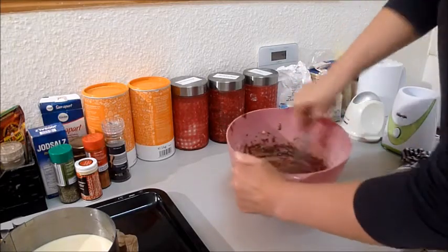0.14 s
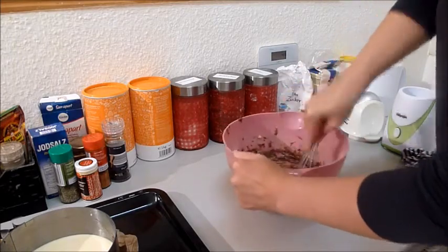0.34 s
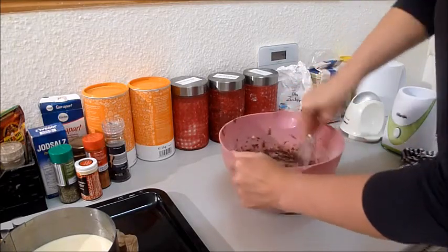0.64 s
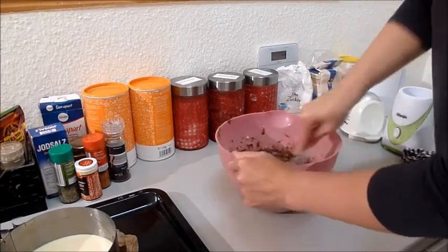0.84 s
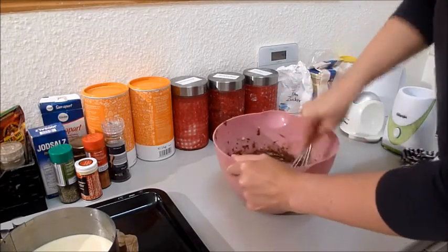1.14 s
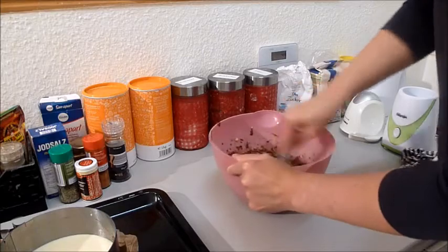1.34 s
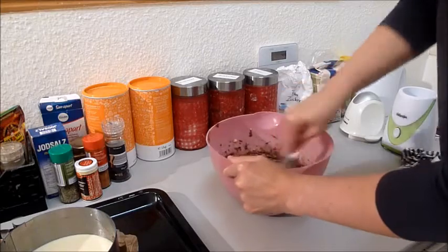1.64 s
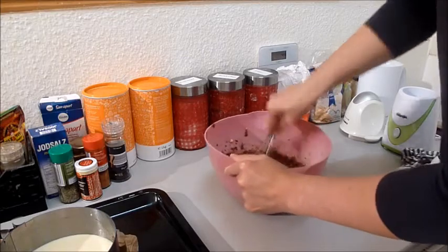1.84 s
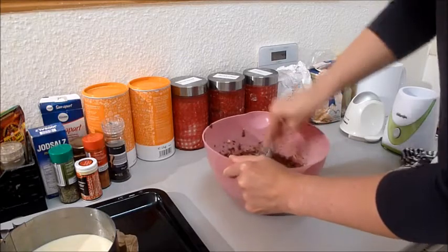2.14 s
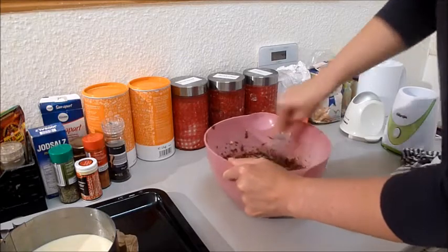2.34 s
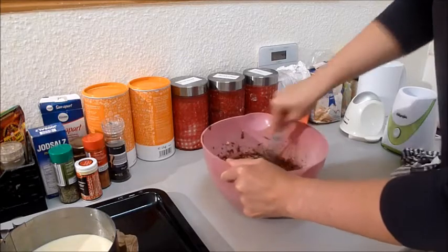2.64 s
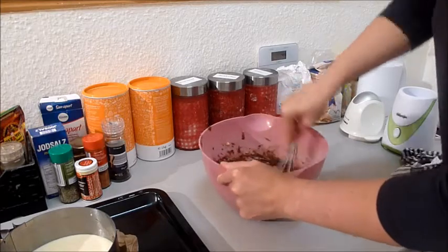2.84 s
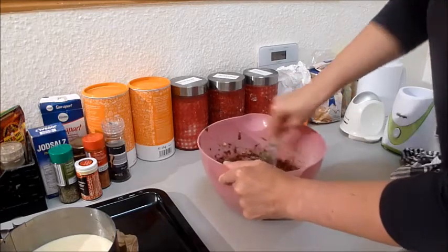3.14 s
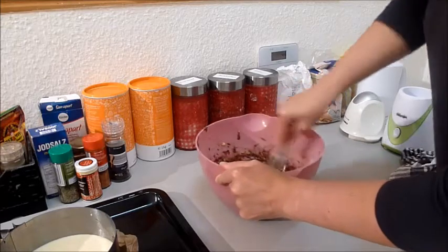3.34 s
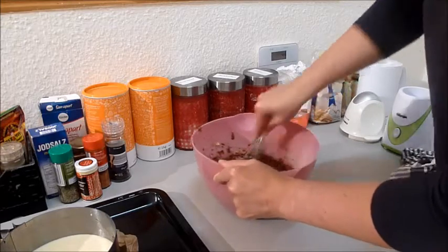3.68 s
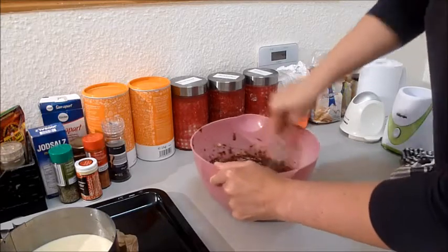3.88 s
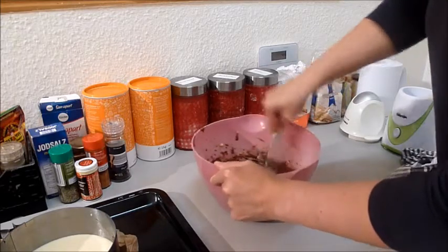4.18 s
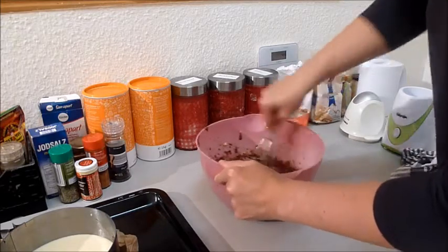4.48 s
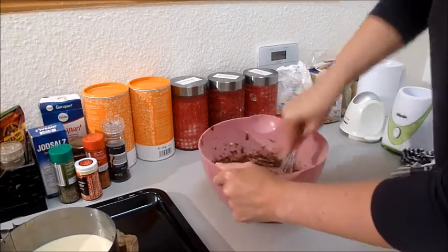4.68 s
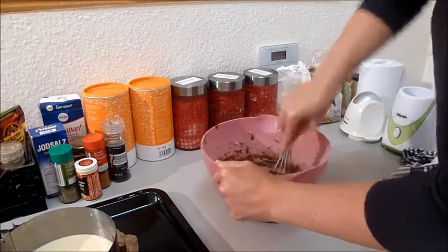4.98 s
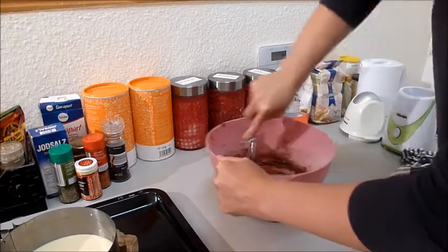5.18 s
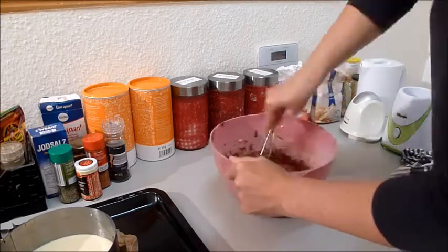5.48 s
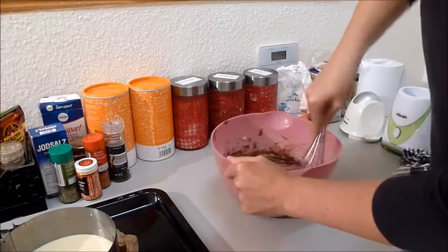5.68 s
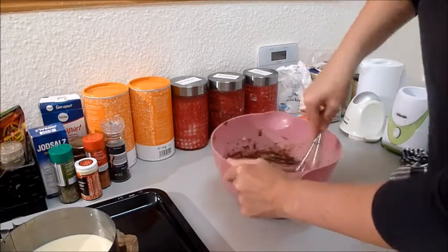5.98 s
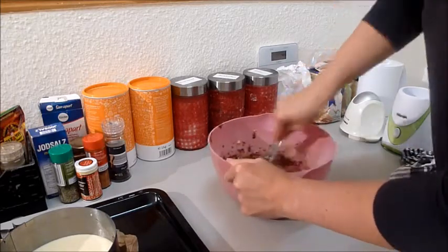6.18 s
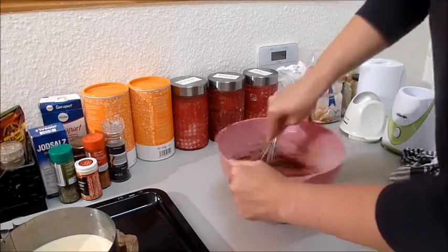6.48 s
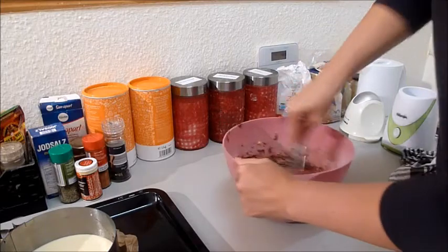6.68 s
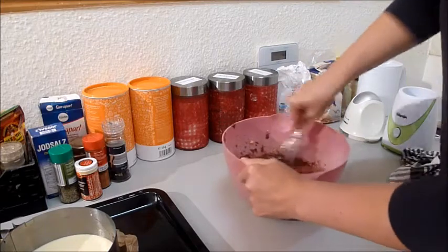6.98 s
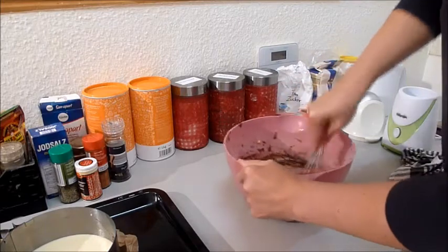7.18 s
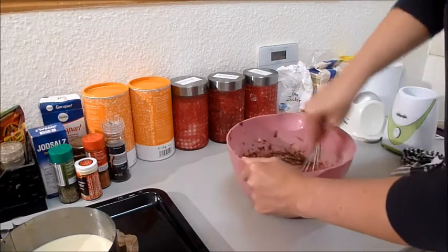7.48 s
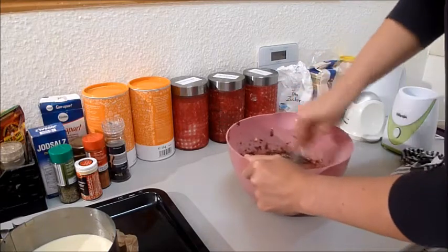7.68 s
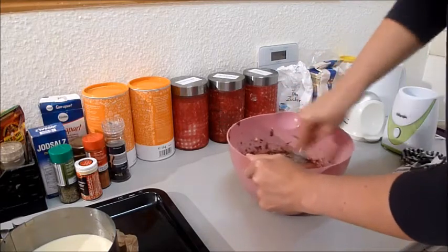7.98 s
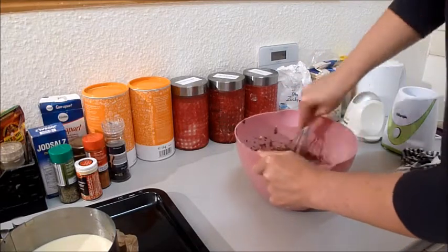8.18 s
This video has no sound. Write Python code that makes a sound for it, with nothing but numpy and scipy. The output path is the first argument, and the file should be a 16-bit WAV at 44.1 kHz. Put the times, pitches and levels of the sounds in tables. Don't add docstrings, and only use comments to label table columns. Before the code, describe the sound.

Continuous energetic whisking in a thin plastic bowl on a kitchen counter. Wires clatter and drag against the wall between quick, uneven blows; thick batter damps each ring. The middle has a dense run of soft thuds and hard knocks, then strokes loosen into stronger clacks with lighter taps between. Faint low bumps come from the counter. A small reflective room, heard from about a step away through a narrow-band microphone.

```python
import sys
import numpy as np
from scipy import signal
from scipy.fft import rfft, irfft
from scipy.io import wavfile
from scipy.ndimage import uniform_filter1d, map_coordinates

SR = 44100
rng = np.random.default_rng(int(sys.argv[2]) if len(sys.argv) > 2 else 0)


def ratio(d):
    e = np.asarray(d, float) / 20
    return 10 ** e


def to_wav(s):
    ch = np.atleast_2d(s).T
    pcm = np.round(np.clip(ch, -1, 1) * 32767)
    wavfile.write(sys.argv[1], SR, pcm.astype(np.int16))


N = 366912


def evened(x):
    return x / np.sqrt(np.mean(x ** 2) + 1e-20)


def peaked(x):
    return x / abs(x).max()


def add(mix, start_s, sound):
    part = mix[round(start_s * SR):][:len(sound)]
    part += sound[:len(part)]


def ring(modes, chance, detune, rise_s=1e-4, scatter_db=0.5, size=1800):
    hz, db, t60 = np.transpose(modes)[:, :, None]
    t = np.arange(size) / SR
    weight, tune, phase = chance[:len(hz)].T[:, :, None]
    level = ratio(db + scatter_db * weight - 60 * t / t60) * (1 - np.exp(-t / rise_s))
    waves = np.sin(2 * np.pi * (hz * (1 + detune * tune) * t + phase))
    return (level * waves).sum(0)


def one_mode(hz, db, t60, rise_s=1e-4, size=1800):
    return ring([(hz, db, t60)], np.zeros((1, 3)), 0, rise_s, size=size)


def clumps(count):
    knot_s, clump_s, depth_db = 0.004, 0.012, 4.5
    knots = rng.standard_normal((count, round(N / SR / knot_s) + 2))
    smooth = evened(uniform_filter1d(knots, round(clump_s / knot_s), axis=1))
    at = np.arange(N) / SR / knot_s
    return [ratio(depth_db * np.interp(at, np.arange(len(row)), row)) for row in smooth]


# pitch_hz [Hz], level_db [dB]
HOLLOW_MODES = [(155, -4.5), (230, -11.5), (327, -7), (432, -24.5), (494, 3), (545, 6.5), (582, 0),
                (630, -7.5), (686, 4.5), (800, -4.5)]
# pitch_hz [Hz], level_db [dB]
WALL_MODES = [(1035, -0.5), (1166, -6), (1245, 2.5), (1370, -11.5), (1470, 3.5), (1620, -5), (1765, -7),
              (1880, 2), (2040, -7), (2200, -0.5), (2450, -5), (2650, -5)]
# pitch_hz [Hz], level_db [dB]
WIRE_MODES = [(2800, 2), (3500, -2), (4400, -3), (5400, 0), (6500, -11)]
BODIES = [[(hz, db, t60) for hz, db in modes]
          for modes, t60 in ((HOLLOW_MODES, 0.03), (WALL_MODES, 0.02), (WIRE_MODES, 0.002))]
DETUNE = (0.023, 0.083, 0.17)
# pitch_hz [Hz], level_db [dB], t60_s [s]
FIZZ_MODES = [(4300, 5.5, 0.0021), (5180, -6.5, 0.0019), (6100, -4, 0.0028), (6800, -0.5, 0.0036)]
# start_s [s], bottom_db [dB], wall_db [dB]
DRAG_PRESSURE = [(0.0, -32, -35), (0.37, -33.5, -37), (0.63, -35.5, -35.5), (1.431, -36.5, -37.5),
                 (2.461, -38.5, -37.5), (2.87, -31.5, -34), (3.22, -32, -38), (4.43, -39.5, -37),
                 (4.73, -38, -35), (5.08, -32, -33.5), (5.331, -42.5, -33.5), (5.91, -41.5, -40),
                 (6.33, -34, -35), (6.77, -43, -40), (7.25, -34, -35.5), (7.6, -43.5, -41.5),
                 (7.92, -35, -40), (8.32, -45, -40)]
# landing_s [s], air_s [s], depth_db [dB]
WHISK_LIFTS = [(0.099, 0.084, -7), (0.7, 0.081, -4.5), (.93, 0.081, -3), (1.19, 0.03, -9.5),
               (1.499, 0.095, -2), (1.8, 0.086, -3.5), (2.3, 0.069, -1.5), (3.103, 0.038, -15),
               (3.599, 0.061, -1.5), (4.219, 0.057, -1), (4.348, 0.067, -6.5), (4.458, 0.078, -5.5),
               (5.106, 0.16, -13.5), (5.506, 0.076, -11.5), (5.861, 0.046, -34), (6.717, 0.09, -10),
               (6.95, 0.13, -4.5), (7.241, 0.045, -15), (7.53, 0.088, -6.5), (7.705, 0.12, -1.5),
               (1.36, 0.037, 1.5), (1.739, 0.071, -5.5), (3.03, 0.037, -5), (4.5, 0.014, -10),
               (5.948, 0.3, -2), (8.12, 0.035, -3), (3.667, 0.053, -5), (2.49, 0.031, -1),
               (3.27, 0.044, -1.5)]


def drag():
    slips_per_s, slip_spread_db, hiss_db = 600, 3, -1.5
    lift_ramp_s, strokes_per_s, spots = 0.041, 3.3, 6
    start_s, bottom_db, wall_db = np.transpose(DRAG_PRESSURE)
    t = np.arange(N) / SR
    lifted_db = np.zeros(N)
    for landing_s, air_s, depth_db in WHISK_LIFTS:
        lifted_db += depth_db * np.clip((t - landing_s + air_s) / lift_ramp_s, 0, 1) * (t < landing_s)
    # modes, detune, trim dB, colour scatter dB, pitch wander, pressure
    layers = [(BODIES[0], DETUNE[0], -1.5, 2.7, 0.012, bottom_db),
              (BODIES[1], DETUNE[1], -5, 5, 0.04007, wall_db),
              (BODIES[2], DETUNE[2], -7.5, 1.5, 0.05, wall_db),
              (FIZZ_MODES, 0.08, -15, 2.2, 0.05, wall_db)]
    out = np.zeros(N)
    for modes, detune, trim_db, patch_db, wander, pressure_db in layers:
        force = ratio(slip_spread_db * np.minimum(rng.exponential(1, N), 4))
        slips = force * (rng.random(N) < slips_per_s / SR)
        rub = evened(slips) + ratio(hiss_db) * rng.standard_normal(N)
        spot = rng.integers(0, spots, N)
        body = np.zeros(N)
        for k, gain in enumerate(clumps(spots)):
            colour = ring(modes, rng.standard_normal((12, 3)), 0.86 * detune, scatter_db=patch_db)
            body += signal.oaconvolve(rub * gain * (spot == k), colour)[:N]
        circle = 2 * np.pi * strokes_per_s
        bent = t + wander * np.sin(circle * t) / circle
        body = map_coordinates(body, [bent * SR], order=2, mode="mirror")
        out += ratio(np.interp(t, start_s, pressure_db) + lifted_db + trim_db) * evened(body)
    return out


def skidding_wires(clack_hz, on_wall, skid_s):
    t = np.arange(1500) / SR
    n = rng.standard_normal(len(t))
    skid = n * abs(n) * np.minimum(4.2 * t / skid_s, 1) * np.exp(-t / skid_s)
    spread = rfft(skid, 2048)
    skid = irfft(spread / np.sqrt(uniform_filter1d(abs(spread) ** 2, size=24)))[:len(t)]
    chance = rng.standard_normal((12, 3)) * [1, 1, 0]
    wires = ring(BODIES[2], chance, DETUNE[2], scatter_db=3.0, size=300)
    wires += one_mode(clack_hz * (not on_wall), 0.5, 0.003, size=300)
    return peaked(signal.lfilter(*signal.butter(2, 2200, "high", fs=SR), signal.fftconvolve(wires, skid)))


def blows(rows):
    bounce_s, bounce_db = 0.021, -14.5
    out = np.zeros(N)
    for start_s, hollow_db, hollow_hz, wall_db, clack_hz, wires_db in rows:
        slower = ratio(0.65 * (-12.0 - max(hollow_db, wall_db, wires_db)))
        on_wall = clack_hz < 2800

        hollow = ring(BODIES[0], rng.standard_normal((12, 3)), DETUNE[0], 0.00045 * slower)
        hollow += one_mode(hollow_hz, 8, 0.032, 0.00045 * slower)
        hollow = ratio(hollow_db + 4) * peaked(hollow)
        add(out, start_s, hollow)
        swell = np.minimum(np.arange(len(hollow)) / SR / 0.003, 1)
        add(out, start_s + bounce_s, ratio(bounce_db) * hollow * swell)

        wall = ring(BODIES[1], rng.standard_normal((12, 3)), DETUNE[1], 0.00066 * slower)
        wall += one_mode(clack_hz * on_wall, 11.5, 0.009, 0.00066 * slower)
        add(out, start_s, ratio(wall_db + 0.5) * peaked(wall))

        glance = 1 if on_wall else 1.09
        skid_s = min(0.0043 * slower * glance, 0.0052)
        add(out, start_s, ratio(wires_db + 1.5) * skidding_wires(clack_hz, on_wall, skid_s))
    return signal.sosfilt(signal.butter(2, [223, 7040], "bandpass", fs=SR, output="sos"), out)


# start_s [s], hollow_db [dB], hollow_hz
# [Hz], wall_db [dB], clack_hz [Hz]
HARD_KNOCKS = [(0.005, -23.5, 703, -33.5, 2700), (0.134, -17.5, 530, -38, 1350),
               (0.193, -30, 510, -28, 1790), (0.216, -14.5, 657, -22, 2060), (0.398, -20, 515, -22.5, 1730),
               (0.459, -15, 487, -23.5, 1260), (0.484, -39, 570, -41, 1710), (0.574, -20, 604, -27.5, 1820),
               (0.674, -23.5, 438, -31, 1114), (0.836, -14.5, 537, -22, 1300),
               (0.934, -19, 680, -25.5, 1600), (0.979, -14, 517, -26.5, 1880),
               (1.259, -13.5, 478, -22, 1290), (1.359, -18.5, 530, -32.5, 1120),
               (1.8, -12, 496, -19.5, 2380), (2.072, -27, 500, -25.5, 1280), (2.37, -11.5, 510, -22, 1410),
               (2.76, -20, 557, -26, 2590), (2.933, -12.5, 670, -18.5, 2200), (3.156, -21, 533, -26, 1300),
               (3.181, -8.5, 530, -16.5, 1280), (3.667, -12, 662, -21.5, 1284),
               (3.812, -19.5, 610, -19, 1500), (3.926, -10.5, 490, -17.5, 2020),
               (4.222, -17.5, 490, -30.5, 1290), (4.351, -24.5, 682, -24, 1780),
                (4.507, -17, 454, -26, 1210), (4.528, -23.5, 574, -34, 1270),
                (4.911, -17.5, 533, -26, 2250), (5.108, -14, 544, -19.5, 1550),
                (5.169, -17.5, 490, -34, 1800), (5.508, -12, 433, -11.5, 1670),
                (5.56, -43, 492, -24.5, 1600), (6.134, -22, 558, -24, 1410), (6.297, -49, 810, -17.5, 1940),
                (6.355, -27, 656, -21.5, 1750), (6.7185, -7, 630, -13, 1654),
                (6.973, -18, 540, -21.5, 1270), (7.249, -18, 510, -29, 1820),
                (7.313, -11, 686, -19.5, 1270), (7.534, -19, 530, -31.5, 1750),
                (7.596, -16, 520, -27, 1270), (7.7176, -13, 681, -16.5, 1440), (7.824, -23, 498, -29, 1030),
                (7.884, -15.5, 475, -27.5, 1430), (7.993, -25, 624, -30, 1250),
                (8.173, -18.5, 490, -26.5, 1370)]


def knocks():
    return blows([(s, db, hz, wall_db + 5, clack_hz, wall_db - 4)
                  for s, db, hz, wall_db, clack_hz in HARD_KNOCKS])


# start_s [s], wires_db [dB]
WIRE_SLAPS = [(0.0054, -21), (0.2193, -12.5), (0.3986, -14), (0.484, -20.5), (0.834, -24), (0.9343, -25),
              (0.978, -21), (1.3605, -24.5), (1.7999, -20), (2.6604, -32), (3.1818, -12), (3.2814, -51),
              (3.423, -20.5), (3.6024, -50), (3.8107, -15.5), (3.924, -11), (4.9106, -12), (5.1084, -9.5),
              (5.508, -10), (6.7187, -11.5), (6.9732, -13.5), (7.0813, -23), (7.3145, -16), (7.5944, -19.5),
              (7.7175, -11)]


def slaps():
    return blows([(s, -89.5, 0, -89.5, 0, db - 2.5) for s, db in WIRE_SLAPS])


# start_s [s], hollow_db [dB],
# pitch_hz [Hz]
BOTTOM_THUDS = [(0.1, -21, 700), (1.091, -22.5, 760), (1.197, -18.5, 680), (1.689, -26, 495),
                (1.908, -11, 560), (2.027, -16, 517), (2.203, -21, 530), (2.3, -16.5, 536),
                (2.352, -19.5, 530), (2.485, -18, 530), (2.546, -29, 584), (2.658, -12.5, 502),
                (2.809, -16.5, 503), (2.915, -21, 640), (3.04, -11, 567), (3.115, -14, 540),
                (3.282, -10.5, 565), (3.356, -15, 500), (3.423, -13, 503), (3.603, -16, 505),
                (3.752, -23.5, 540), (3.776, -18.5, 670), (3.869, -16, 503),
                (4.111, -20.5, 546), (4.148, -33, 526), (4.465, -21, 557), (4.701, -19, 690),
               (4.79, -15, 435), (6.005, -24.5, 655), (6.102, -28, 696), (6.183, -8.5, 514),
               (6.243, -20, 524), (6.402, -14, 657), (6.506, -22, 495), (6.552, -19, 494),
               (6.806, -20.5, 596), (7.082, -27, 540), (7.182, -18.5, 670), (8.12, -16, 446)]


def thuds():
    return blows([(s, db - 4.5, hz, db - 16, 0, db - 17) for s, db, hz in BOTTOM_THUDS])


# start_s [s], wires_db [dB], pitch_hz [Hz], hollow_db [dB]
WIRE_TICKS = [(0.1272, -20, 4000, -30.5), (0.3434, -24.5, 4450, -29.5), (0.3917, -20, 3100, -25.5),
              (0.7058, -17, 4850, -41), (0.774, -19, 4290, -40), (1.5124, -11.5, 4300, -24),
              (1.5644, -17, 3240, -21.5), (1.6325, -16.5, 2900, -44), (1.6395, -18.5, 5300, -27.5),
              (1.6688, -26, 3050, -44), (2.1266, -27, 3440, -33), (2.1424, -14, 4000, -21),
              (2.4156, -12, 3900, -27), (2.5938, -18.5, 4840, -24), (2.6874, -19.5, 4810, -36),
              (2.705, -24, 4400, -28), (2.7506, -13.5, 4790, -30), (2.7787, -17.5, 4230, -48),
              (2.8593, -22, 3800, -19.5), (2.8637, -17.5, 3920, -20), (3.0181, -18, 4340, -30),
              (3.3447, -40, 4380, -30), (3.495, -19, 4240, -25.5), (4.0482, -23.5, 2980, -30),
              (4.5977, -40, 3970, -48), (4.621, -38, 3420, -24), (4.8446, -14.5, 3040, -31.5),
              (5.2883, -20, 3160, -33), (7.371, -26, 5180, -49), (7.4184, -19, 3920, -23)]


def ticks():
    return blows([(s, hollow_db - 1, 0, db - 9, hz, db - 2.5) for s, db, hz, hollow_db in WIRE_TICKS])


# start_s [s], length_s [s], level_db [dB],
# pitch_hz [Hz]
PLASTIC_SCRAPES = [(.29, 0.056, -38.5, 4560), (0.417, .1, -38, 3500), (0.707, 0.035, -43, 3200),
                   (1.049, 0.021, -36.5, 6000), (1.086, 0.043, -38.5, 2600), (1.525, 0.084, -35, 5500),
                   (1.643, 0.043, -38, 5300), (1.739, 0.037, -33, 560), (2.117, 0.048, -35.5, 4300),
                   (2.418, 0.085, -42, 4870), (2.583, 0.028, -40.5, 4600), (2.673, 0.1, -42.5, 4450),
                   (2.852, 0.031, -32.5, 4230), (3.023, 0.027, -52, 4220), (3.043, 0.021, -41.5, 560),
                   (3.446, 0.055, -44, 4300), (3.743, 0.056, -40.5, 4200), (3.931, 0.029, -48, 4480),
                   (4.24, 0.053, -41, 555), (4.261, 0.07, -43.5, 5060), (4.349, 0.026, -38, 3760),
                   (4.536, .05, -42.5, 4020), (4.591, 0.035, -33.5, 5240), (4.678, 0.023, -42, 1980),
                   (4.827, 0.052, -34.5, 5030), (5.284, 0.11, -45, 3480), (5.697, 0.039, -37, 3260),
                   (5.962, 0.19, -40, 3000), (6.365, 0.13, -38, 3160), (6.556, 0.048, -43, 556),
                   (6.793, 0.0086, -42, 3520), (7.321, 0.079, -40, 4800), (7.403, 0.022, -44, 4000),
                   (7.702, .01, -38, 1600), (7.927, 0.049, -38.5, 4250), (1.462, 0.018, -44, 5000),
                   (6.501, 0.045, -41, 546), (6.847, 0.027, -45.5, 620), (1.198, 0.018, -37, 660),
                   (1.274, 0.034, -37.5, 1090), (5.854, 0.13, -49, 1900), (6.577, 0.066, -47, 2200),
                   (0.831, 0.02, -30.5, 1300), (1.8, 0.019, -33.5, 1790), (3.184, 0.025, -31, 1410),
                   (4.607, .03, -39, 560), (6.722, 0.026, -37.5, 2100), (5.115, 0.033, -34, 1960),
                   (8.201, 0.055, -47.5, 4500), (0.701, 0.0027, -23, 5300), (0.939, 0.003, -25, 5500),
                   (1.523, 0.0049, -36, 4500)]


def scrapes():
    rise_s, fade_s, slips_per_s, hiss_level = 0.0027, 0.004, 1400, 0.27
    width = 0.3
    out = np.zeros(N)
    for start_s, length_s, level_db, pitch_hz in PLASTIC_SCRAPES:
        t = np.arange(0, length_s + 4 * fade_s, 1 / SR)
        pick, size, hiss = rng.random((SR // 2, 3))[:len(t)].T
        slips = (pick < slips_per_s / SR) * ratio(-3.0 * np.log(size + 0.052))
        rub = evened(slips) + hiss_level * 1.9 * (hiss - 0.5)
        edges = np.clip(pitch_hz * np.array([1 - width, 1 + width]), 100, 9000)
        rub = evened(signal.lfilter(*signal.butter(1, edges, "bandpass", fs=SR), rub))
        stroke = np.minimum(t / min(rise_s, length_s / 5), 1)
        stroke *= np.exp(-np.maximum(t - length_s, 0) / min(fade_s, length_s))
        add(out, start_s, ratio(level_db) * stroke * rub)
    return out


# start_s [s], level_db [dB], pitch_hz [Hz]
WIRE_SNAPS = [(0.3979, -19, 3850), (0.7057, -6, 3080), (0.774, -27, 4290), (0.9347, -26, 5580),
              (1.5119, -17, 4260), (1.5642, -23, 3240), (1.6291, -18, 2920), (1.6386, -11, 2940),
              (1.6685, -22, 3050), (1.9673, -30, 2810), (2.126, -20.5, 3450), (2.2831, -40, 4340),
              (2.3081, -19, 4010), (2.4148, -13.5, 3840), (2.5121, -27, 3080), (2.5929, -18, 4660),
              (2.6867, -23, 4800), (2.7056, -24, 4400), (3.0169, -20, 4370), (3.254, -23, 2980),
              (3.3447, -13.5, 4410), (3.4639, -24, 5000), (3.495, -19, 4260), (3.5976, -34, 3770),
              (3.7513, -28, 4310), (3.865, -19, 2950), (4.0955, -23, 3060), (4.142, -19, 4240),
              (4.4582, -20.5, 3180), (4.767, -29, 3270), (4.8448, -17, 4400), (4.9106, -19, 2940),
              (5.9662, -32, 3640), (6.7983, -24, 3640), (7.6908, -32, 2960), (7.9273, -31, 3590),
              (7.9467, -19, 3860), (8.1228, -40, 3900)]
# start_s [s], level_db [dB], pitch_hz [Hz]
BLOW_CRACKS = [(0.461, -29, 990), (1.8015, -8, 1200), (3.668, -3, 910), (5.109, -10, 1500),
               (5.509, -20, 1400), (6.719, -7, 660), (7.314, -13, 1000), (7.718, -4, 990),
               (0.837, -19, 1900), (1.26, -20, 1700), (3.183, -11, 1790), (3.927, -11, 1140),
               (6.2985, -8, 2020)]


def snaps_and_cracks():
    out = np.zeros(N)
    for rows, cycles in ((WIRE_SNAPS, 9), (BLOW_CRACKS, 5.3)):
        for start_s, level_db, pitch_hz in rows:
            modes = [(pitch_hz * 1.35 ** k, -3.0 * abs(k), cycles / pitch_hz) for k in (-1, 0, 1)]
            sound = ring(modes, rng.standard_normal((3, 3)), 0.027, 0.00012, size=600)
            add(out, start_s, ratio(level_db - 5) * peaked(sound))
    return out


# start_s [s], level_db [dB], pitch_hz [Hz]
COUNTER_BUMPS = [(0.838, -44.5, 274), (1.258, -40, 345), (1.796, -36, 295), (2.37, -27, 314),
                 (2.931, -30, 307), (3.181, -34, 294), (3.929, -41, 362), (5.118, -29, 322),
                 (5.505, -26.5, 330), (6.189, -51.5, 344), (6.719, -24, 310), (7.313, -32.5, 321),
                 (7.882, -34.5, 302), (8.171, -48, 320)]
# start_s [s], level_db [dB], pitch_hz [Hz]
BATTER_PUSHES = [(.854, -21, 694), (1.21, -17.5, 688), (1.272, -20, 706), (1.585, -23, 598),
                 (2.385, -24, 660), (3.685, -33, 700), (4.147, -22, 543), (6.575, -19.5, 530),
                 (6.733, -19.5, 670), (6.845, -21, 617), (6.979, -13.5, 550), (7.003, -16.5, 527),
                 (7.325, -27, 700), (7.545, -15.5, 536), (7.612, -22.5, 610), (7.722, -29, 690),
                 (7.733, -27, 695), (7.9, -28, 613)]


def bumps_and_pushes():
    out = np.zeros(N)
    for rows, t60, rise_s in ((COUNTER_BUMPS, 0.1, 0.014), (BATTER_PUSHES, 0.032, 0.00093)):
        for start_s, level_db, pitch_hz in rows:
            add(out, start_s, ratio(level_db - 2) * peaked(one_mode(pitch_hz, 0, t60, rise_s, 4000)))
    return out


# start_s [s], wall_db [dB], pitch_hz [Hz], wires_db [dB]
WALL_CLACKS = [(1.865, -36, 1710, -32), (3.4667, -36, 2610, -32), (4.6875, -29, 2080, -30),
               (5.249, -25, 2400, -30.5), (5.3555, -21, 2020, -25), (5.69, -19, 1880, -33),
               (5.855, -13.5, 1860, -49), (5.967, -22.5, 1970, -22), (6.054, -25, 1250, -25.5),
               (6.1523, -24, 1960, -23.5), (6.1732, -15.5, 1350, -14.5), (6.4167, -30, 2560, -25.5),
               (6.5969, -20, 1890, -52), (6.8799, -19.5, 1520, -49), (6.9478, -27, 2100, -33),
               (7.4888, -25.5, 1700, -37), (7.7345, -25, 1160, -33), (7.947, -35, 2380, -25.5),
               (8.081, -21, 1500, -55)]


def clacks():
    return blows([(s, db - 14, 0, db - 4, hz, wires_db + 3) for s, db, hz, wires_db in WALL_CLACKS])


# pitch_hz [Hz], level_db [dB], t60_s [s]
RIM_MODES = [(1410, 4, 0.036), (1546, 1, 0.034), (2418, -4, 0.043), (3050, -12.5, 0.027)]
# start_s [s], level_db [dB], pitch_ratio [of the middle of the rim]
RIM_BLOWS = [
    (5.109, -8.5, 1.03),
    (5.12, -17, 1.36),
    (5.51, -15.5, 1.18),
    (6.3, -20.5, 1.42),
    (6.72, -17, 1.16),
    (7.717, -18.5, .9),
]


def rim():
    out = np.zeros(N)
    for start_s, level_db, pitch_ratio in RIM_BLOWS:
        modes = np.array(RIM_MODES) * [pitch_ratio, 1, 1]
        sound = ring(modes, rng.standard_normal((4, 3)), 0.012, 0.00074, size=3000)
        add(out, start_s, ratio(level_db + 1.5) * peaked(sound))
    return out


# band_hz [Hz], t60_s [s], level_db [dB]
KITCHEN_BANDS = [(200, 0.58, -3.5), (530, 0.28, -3), (1440, 0.32, -1.5), (3760, 0.58, -8.5),
                 (6660, 0.45, -7.5)]
# delay_s [s], level_db [dB]
EARLY_ECHOES = [(.0031, -26), (.0077, -14), (.0123, -13.5), (.0194, -20), (0.0225, -28), (0.0287, -32.5)]


def kitchen(x):
    size, dullness = SR // 2, 0.07
    band_hz, t60, band_db = np.transpose(KITCHEN_BANDS)
    turn = 2 * np.pi * 1.7 * np.arange(len(x)) / SR
    out = x.copy()
    dull = signal.lfilter([1 - dullness], [1, -dullness], x)
    for delay_s, level_db in EARLY_ECHOES:
        add(out, delay_s, ratio(level_db) * dull)
    for k in range(3):
        taps = np.zeros(size)
        at = np.arange(620, size - 10, 10)
        taps[at + rng.integers(0, 10, len(at))] = rng.choice([-1., 1.], len(at))
        hz, t, z = signal.stft(taps, SR, nperseg=256)
        z = z * ratio(-60 * t / np.interp(hz, band_hz, t60)[:, None])
        energy = np.linalg.norm(signal.istft(z, SR, nperseg=256)[1])
        z = z * ratio(np.interp(hz, band_hz, band_db))[:, None] / energy
        tail = signal.istft(z, SR, nperseg=256)[1]
        share = np.sqrt(2 / 3) * np.cos(turn + 2 * np.pi * k / 3)
        out += signal.fftconvolve(x * share, tail)[:len(x)]
    return out


def blotched(x):
    hz, t, z = signal.stft(x, SR, nperseg=512)
    patch = uniform_filter1d(rng.standard_normal(z.T.shape), size=5, axis=0)
    patch = evened(uniform_filter1d(patch, size=6, axis=1)).T
    z = z * ratio(2 * patch * np.minimum(hz / 1500, 1)[:, None] ** 2)
    return signal.istft(z, SR, nperseg=512)[1][:len(x)]


def scene():
    lead = SR // 4
    rubbed = drag()
    struck = knocks() + slaps() + thuds() + ticks() + clacks()
    struck += scrapes() + snaps_and_cracks() + bumps_and_pushes() + rim()
    struck = np.pad(struck, (lead, 0), "reflect")
    whole = kitchen(struck + np.pad(rubbed, (lead, 0), "reflect"))
    return (struck + blotched(whole - struck))[None, lead:]


# pitch_hz [Hz], level_db [dB]
MIC_RESPONSE = [(60, -30.5), (110, -17), (200, -8.5), (400, -3.5), (3000, 0.5), (5500, -2), (6800, -8.5),
                (7300, -16.5), (7900, -41), (8400, -85)]


def microphone(dry):
    hz = abs(np.fft.fftfreq(8192, 1 / SR))
    mic_hz, mic_db = np.transpose(MIC_RESPONSE)
    log_gain = np.log(ratio(np.interp(np.log(hz + 1), np.log(mic_hz + 1), mic_db)))
    colour = np.fft.ifft(np.exp(log_gain - 1j * signal.hilbert(log_gain).imag)).real[:4096]
    led_in = np.pad(dry, ((0, 0), (4096, 0)), "reflect")
    heard = signal.oaconvolve(led_in, colour[None])[:, 4096:4096 + N]
    return heard + ratio(-103) * rng.standard_normal(dry.shape)


def roll_off(x):
    return signal.sosfilt(signal.butter(12, 8100, fs=SR, output="sos"), x)


def record(dry):
    mix = microphone(dry)
    return roll_off(mix)


dry = scene()
out = record(dry)
to_wav(out)
```